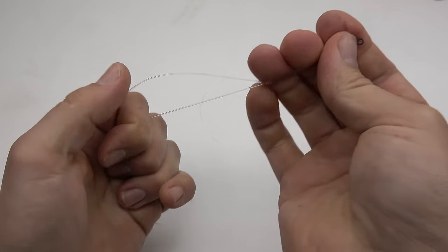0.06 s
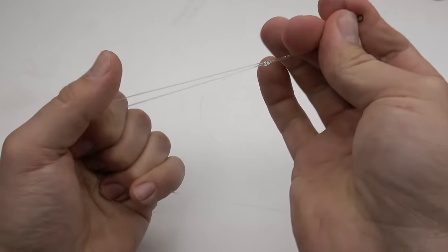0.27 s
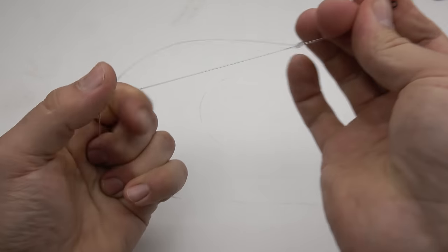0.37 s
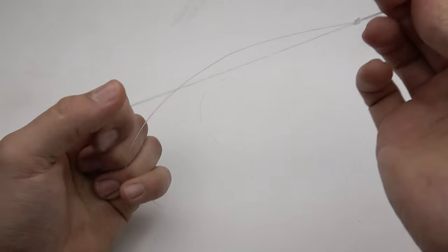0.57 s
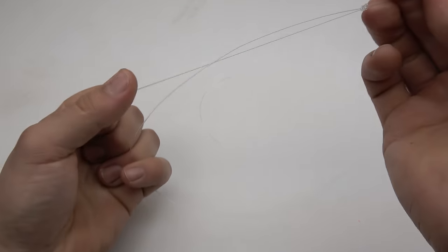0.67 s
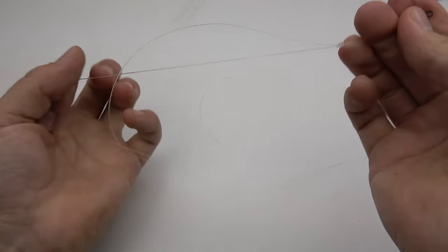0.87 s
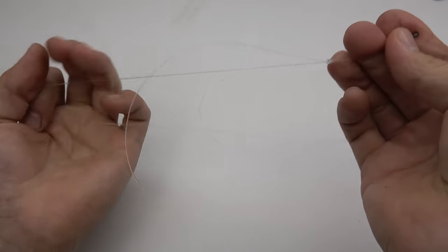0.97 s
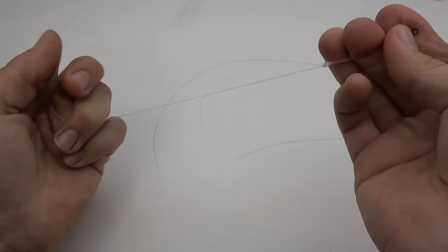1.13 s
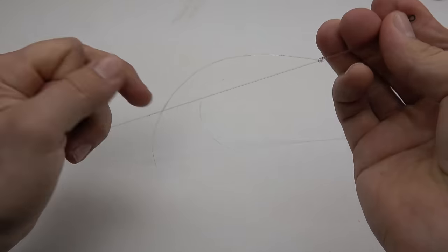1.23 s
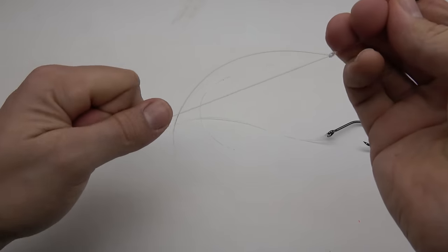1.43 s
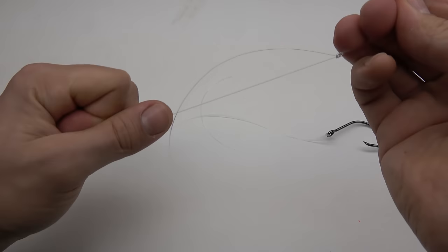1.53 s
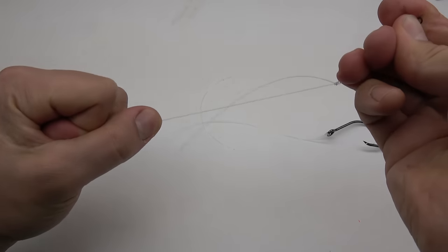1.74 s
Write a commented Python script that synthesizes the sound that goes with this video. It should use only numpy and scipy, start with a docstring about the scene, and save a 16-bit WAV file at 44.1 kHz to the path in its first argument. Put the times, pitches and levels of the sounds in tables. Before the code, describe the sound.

Hands tighten a fishing line knot with creaks, thumps and clicks, then faint sliding.

```python
"""A low rustle and creak, then dull thumps: two hands jerk a knot of fishing line taut on a metal swivel.
The knot slips with hollow knocks and snaps; the swivel's ring clinks against its barrel and the line
squeaks thinly as it binds on the eye. Then the line slides through the fingers with a fine stick-slip
rasp and small ticks. All close to the microphones, in a small room."""
import sys
import numpy as np
from scipy import signal
from scipy.fft import rfft, irfft
from scipy.io import wavfile
from scipy.ndimage import uniform_filter1d

SR = 44100
rng = np.random.default_rng(int(sys.argv[2]) if len(sys.argv) > 2 else 0)


def waveform_to_disk(signal):
    """Save audio, clipped to [-1, 1], as 16-bit WAV at the path in sys.argv[1]."""
    frames = np.transpose(np.atleast_2d(signal))
    scaled = np.clip(frames, -1, 1) * 32767
    samples = np.round(scaled).astype(np.int16)
    wavfile.write(sys.argv[1], SR, samples)


N = 79380
T = np.arange(N) / SR

# room air spectrum: freq_hz, density_db
AIR_SPECTRUM = [(12, -41), (20, 6), (113, 3.5), (204, -7), (241, -12.5), (485, -3.5), (527, -16.5),
                (678, -6.5), (1370, -10), (1960, -11), (16000, -21.5)]
# hand rustle envelope: time_s, level_db
RUSTLE_LEVEL = [(0, -57.5), (.15, -59.5), (.5, -48), (.95, -71.5), (1.12, -64), (1.24, -66), (1.29, -56.5),
                (1.5, -69.5), (1.62, -71.5), (1.8, -76)]
# hand rustle spectrum: freq_hz, density_db
RUSTLE_SPECTRUM = [(30, -12.5), (60, 3.5), (140, -1.5), (300, -2.5), (600, -10.5), (1500, -19.5),
                   (5000, -30.5), (16000, -40)]
# left-right likeness of air and rustle: freq_hz, coherence
BACKGROUND_COHERENCE = [(60, 1), (300, 0.76), (700, 0.64), (3000, 0.97), (15000, 0.2)]
# left-right likeness of the room tail: freq_hz, coherence
ROOM_COHERENCE = [(100, 0.78), (500, 1), (2500, 0.96), (6000, 0.68), (15000, .6)]
# left-right likeness of the line's noises: freq_hz, coherence
LINE_COHERENCE = [(100, 0.84), (2500, 1), (5000, 0.99), (8500, 0.77), (15000, 0.88)]
# room decay: freq_hz, t60_s
ROOM_DECAY = [(100, 0.37), (500, 0.21), (2000, 0.26), (6000, 0.13), (15000, 0.083)]
# low room resonances: freq_hz, gain_db, t60_s
ROOM_MODES = [(79, 0, .48), (108, 4, .38), (128, 2, .38), (217, 2, .36), (267, -1, .38), (435, 5, .42)]
# feed to the room tail: source, gain_db
ROOM_SEND_DB = {"thump": -18, "knock": -10.5, "snap": -10.5, "metal": -11, "rub": -15.5}
# reflections off palms and table: left_delay_s, right_delay_s, level_db
ECHOES = [(.00062, 0.00033, -22), (.0019, 0.0015, -29.5), (.0034, 0.0065, -19)]
# microphone mismatch: freq_hz, left_minus_right_db
MIC_BALANCE = [(60, 2), (115, -1), (210, 4.5), (500, 0.5), (1200, 1.5), (4000, -2), (15000, -0.5)]
# source positions: source, left_minus_right_db
PAN_DB = {"thump": -4, "knock": -1, "metal": -6.5}
# position of rubbing and snaps: time_s, left_minus_right_db
LINE_PAN = [(.24, -1.5), (.45, -2.5), (.58, -3), (.66, -1.5), (.9, 0), (1.5, 0.7)]

# creak of loaded line: time_s, level_db
CREAK_LEVEL = [(0, -80), (.18, -59), (.203, -43.5), (.235, -39.5), (.255, -33), (.28, -42), (.34, -45.5),
               (.41, -56.5), (.45, -58.5), (.525, -52.5), (.546, -31.5), (.6, -34.5), (.655, -38.5),
               (.7, -50.5), (.78, -69.5), (1.8, -81.5)]
# creak spectrum: freq_hz, density_db
CREAK_SPECTRUM = [(60, -11), (200, 10), (500, 7.5), (1000, -2.5), (2200, -7), (4000, -3.5), (8000, -6),
                  (12500, -12), (16000, -20)]
# line sliding through the fingers: time_s, level_db, brightness (0-1)
SLIDE = [(.6, -42, 0.9), (.68, -42, 0.96), (.74, -42.5, 0.81), (.76, -59, .9), (.77, -42, 0.97),
         (.825, -53, 0.81), (.875, -43, 0.99), (.91, -51.5, 0.92), (.925, -56.5, 0.5), (.985, -65, 1),
         (.998, -45.5, 1), (1.025, -49.5, 1), (1.1, -46, 0.82), (1.175, -48, 0.5), (1.2, -59.5, 0.8),
         (1.22, -49.5, 0.02), (1.26, -59, 0.47), (1.32, -55, 0.47), (1.385, -50, .4), (1.415, -49.5, 0.5),
         (1.455, -40.5, 0.23), (1.478, -49.5, 0.27), (1.5, -44.5, 0.38), (1.525, -59, 0.2),
         (1.58, -66.5, 0.53), (1.8, -83, 0.05)]
# brisk slide spectrum: freq_hz, density_db
BRISK_SPECTRUM = [(100, -55), (1000, -17), (2000, -21.5), (3000, -17), (4500, -3), (8000, 1.5),
                  (11000, -7.5), (13500, -8.5), (16000, -21)]
# slow slide spectrum: freq_hz, density_db
SLOW_SPECTRUM = [(100, -1), (500, -27), (1000, -9.5), (1500, -7), (2050, -5.5), (2600, 6.5), (4200, 7.5),
                 (5500, 1), (8000, -16), (11000, -11.5), (13000, -13), (16000, -27)]
# ring striking the barrel: start_s, relative_db, pitch_ratio
CLINKS = [(.434, -22, 1), (.4772, -3, .995), (.5415, -7, 1.025), (.5818, 0, 1.025), (.588, -4, 1.02)]
# swivel modes: freq_hz, level_db, t60_s
SWIVEL_MODES = [(4885, -31, .16), (7350, -23, .025), (8700, -25, .04), (11720, -6, .016), (12070, 0, .02),
                (12400, -10, .022), (13170, -15, .03)]
# snaps and ticks of slipping line: start_s, level_db, decay_s, treble_db_per_octave
SNAPS = [(0.199, -35.5, 0.002, -13.5), (.207, -35, 0.0019, -6), (0.242, -28.5, 0.0055, -22.5),
         (0.273, -41, 0.0015, 0), (0.43, -41.5, 0.014, -7), (0.4429, -33, 0.007, -6),
         (0.446, -34.5, 0.0035, 1), (.4777, -36, 0.0082, -4), (0.542, -20.5, 0.0023, -3),
         (0.5697, -18.5, 0.0022, -6.5), (0.5735, -20, 0.003, 2), (0.5891, -28, 0.011, -9),
         (0.6224, -24.5, 0.0032, -3.5), (.641, -28, 0.0027, -7.5), (0.725, -33, 0.002, -4),
         (.766, -42, 0.0037, -6), (0.798, -40, 0.0091, -2), (0.8387, -45.5, 0.0098, -5),
         (0.872, -38, 0.0032, 0), (.887, -37, 0.0023, -1.5), (0.9402, -41, 0.0043, 3),
         (1.09, -39.5, 0.0082, -8.5), (1.229, -46.5, .004, -14.5), (1.381, -45, 0.0057, -9),
         (1.443, -42.5, 0.0037, -11.5), (1.461, -61, 0.0084, -23), (1.4907, -44, 0.0052, -20),
         (1.5936, -58, 0.0059, -2)]
# snap spectrum: freq_hz, density_db
SNAP_SPECTRUM = [(100, -21.5), (800, -42), (2000, -16), (4000, -3.5), (5800, 2), (8500, 6.5), (11000, 2),
                 (13000, 2), (16000, -13.5)]
# hook and swivel resonances: freq_hz, gain_db, t60_s
TACKLE_MODES = [(2606, 2, .15), (3774, -4, .11), (5274, 3, .1), (5775, 1, .1), (5952, 2, .09),
                (7402, -5, .12), (12240, 3, .1), (12539, 5, .09)]
# line giving way in the grip: start_s, level_db, rise_s, decay_s, low_edge_hz, high_edge_hz
KNOCKS = [(.2405, -20.5, .003, 0.0041, 195, 850), (0.282, -29.5, .002, 0.01, 252, 570),
          (0.5351, -16, 0.0016, 0.0029, 388, 2220), (0.6228, -19.5, 0.00033, 0.0053, 460, 3300)]
# knock spectrum: freq_hz, density_db
KNOCK_SPECTRUM = [(130, 1), (250, -7.5), (480, -0.5), (800, -3), (1050, -4.5), (1220, -8.5), (1480, -7),
                  (1950, -7.5), (2550, -4.5), (3500, -5.5), (6000, -24), (16000, -35)]
# ring after a knock: freq_hz, gain_db, t60_s
KNOCK_MODES = [(941, -3, .2), (1406, 5, .3), (1454, 7, .24), (1615, 5, .18)]
# jerks of hands and taut line: start_s, level_db, rise_s
THUMPS = [(0.199, -26, 0.0099), (0.231, -16, 0.012), (0.2487, -11, 0.0037), (0.282, -25, 0.008),
          (0.535, -20.5, 0.0035), (.553, -19.5, .004)]
# modes of a jerk: freq_hz, level_db, t60_s
THUMP_MODES = [(80, -10.5, 0.38), (127, -4.5, .11), (148.3, -6.5, 0.25), (214.3, -0.5, 0.07),
               (231.8, -11.5, 0.17), (474, -3.5, 0.028)]


def amp(db):
    """Decibels to gain."""
    return 10 ** (np.asarray(db) / 20)


def unit_rms(x):
    """Scale to rms 1."""
    return x / np.sqrt(np.mean(x ** 2) + 1e-20)


def at_hz(points, hz):
    """Interpolate a table on a log-frequency axis."""
    points_hz, values = np.transpose(points)
    return np.interp(np.log(hz + 1), np.log(points_hz + 1), values)


def curve(rows, column=1):
    """Interpolate a time table at every sample."""
    rows = np.array(rows)
    return np.interp(T, rows[:, 0], rows[:, column])


def add(mix, start_s, sound):
    """Mix a sound in at start_s."""
    part = mix[..., round(start_s * SR):][..., :sound.shape[-1]]
    part += sound[..., :part.shape[-1]]


def pan(x, left_minus_right_db):
    """Place between left and right; takes a number or a curve."""
    gains = amp(np.array([[.5], [-.5]]) * left_minus_right_db)
    return x * gains / gains.mean(0)


def correlate(channels, coherence):
    """Make two independent channels partly alike, band by band."""
    mid, side = channels
    likeness = np.clip(at_hz(coherence, np.fft.rfftfreq(len(mid), 1 / SR)), 0, .99)
    side = irfft(np.sqrt((1 - likeness) / (1 + likeness)) * rfft(side), len(mid))
    return np.array([mid + side, mid - side])


def noise(coherence, size=N):
    """Stereo Gaussian noise."""
    return correlate(rng.standard_normal((2, size)), coherence)


def colour(x, spectrum, treble_db_per_octave=0, edge_hz=SR):
    """Apply a spectrum, a tilt above 2500 Hz and a low-pass; rms 1."""
    hz = np.fft.rfftfreq(x.shape[-1], 1 / SR)
    tilt_db = treble_db_per_octave * np.log2(np.maximum(hz, 2500))
    gain = amp(at_hz(spectrum, hz) + tilt_db) / np.hypot(1, (hz / edge_hz) ** 4)
    return unit_rms(irfft(rfft(x) * gain, x.shape[-1]))


def ring(modes, rise_s):
    """Decaying modes with a soft onset."""
    t = T[:SR // 2]
    tone = sum(amp(db - 60 * t / t60_s) * np.sin(2 * np.pi * hz * t) for hz, db, t60_s in modes)
    return np.minimum(t / rise_s, 1) * tone


def resonate(x, modes):
    """Add sympathetic ringing; each mode peaks at its gain_db."""
    response = sum(amp(db - 60 * T / t60_s) * np.cos(2 * np.pi * hz * T) * 2 * np.log(1000) / (t60_s * SR)
                   for hz, db, t60_s in modes)
    return x + signal.fftconvolve(x, response[None], axes=1)[:, :N]


def background(air_db=-62):
    """Quiet room air and the low rustle of moving hands."""
    air = amp(air_db) * colour(noise(BACKGROUND_COHERENCE), AIR_SPECTRUM)
    rustle = amp(curve(RUSTLE_LEVEL)) * colour(noise(BACKGROUND_COHERENCE), RUSTLE_SPECTRUM)
    return air + rustle


def room_tail(x, gap_s=0.005):
    """Diffuse reverberation, each band dying at its own rate."""
    hz, t, bands = signal.stft(noise(ROOM_COHERENCE, SR), SR, nperseg=256)
    decay = amp(-60 * t / at_hz(ROOM_DECAY, hz)[:, None])
    tail = signal.istft(bands * decay, SR, nperseg=256)[1][:, :SR] * (T[:SR] > gap_s)
    return signal.fftconvolve(x, tail / np.linalg.norm(tail.mean(0)), axes=1)[:, :N]


def reflect(x):
    """Palms and table add quick echoes, different on each side."""
    hz = np.fft.rfftfreq(2 * N, 1 / SR)
    comb = 1 + sum(amp(db) * np.exp(-2j * np.pi * hz * np.array([[left_s], [right_s]]))
                   for left_s, right_s, db in ECHOES)
    return irfft(rfft(x, 2 * N) * comb / np.sqrt(np.mean(abs(comb) ** 2)))[:, :N]


def friction(spectrum, grains_per_s=3000, spread_db=2.5, grain_share=0.51):
    """Dense stick-slip grains of uneven size over smooth hiss."""
    sizes = amp(spread_db * np.minimum(rng.exponential(1, (2, N)), 4))
    grains = sizes * rng.choice([-1, 1], (2, N)) * (rng.random((2, N)) < grains_per_s / SR)
    hiss = rng.standard_normal((2, N))
    blend = np.sqrt(grain_share) * unit_rms(grains) + np.sqrt(1 - grain_share) * hiss
    return colour(correlate(blend, LINE_COHERENCE), spectrum)


def rubbing():
    """Loaded line creaks, then slides through the fingers, duller as it slows."""
    creak = amp(curve(CREAK_LEVEL)) * friction(CREAK_SPECTRUM)
    brightness = curve(SLIDE, column=2)
    brisk = np.sqrt(brightness) * friction(BRISK_SPECTRUM)
    slow = np.sqrt(1 - brightness) * friction(SLOW_SPECTRUM)
    slide = amp(curve(SLIDE)) * (T > SLIDE[0][0]) * (brisk + slow)
    return pan(creak + slide, curve(LINE_PAN))


def squeak(start_s=.546, length_s=.026, pitch_hz=13845, level_db=-26, waver_ratio=.0015):
    """Line binds on the swivel's eye: a thin, wavering tone."""
    waver = unit_rms(uniform_filter1d(rng.standard_normal(N), size=100))
    hz = pitch_hz * (1 + waver_ratio * waver)
    progress = np.clip((T - start_s) / length_s, 0, 1)
    envelope = np.sqrt(abs(np.sin(np.pi * progress)))
    tone = np.sin(2 * np.pi * np.cumsum(hz) / SR)
    return pan(amp(level_db) * envelope * tone, PAN_DB["metal"])


def clinks(gain_db=-11, rise_s=0.00082):
    """The swivel's ring strikes its barrel and excites high metal modes."""
    out = np.zeros(N)
    for start_s, relative_db, pitch_ratio in CLINKS:
        modes = [(hz * pitch_ratio, db, t60_s) for hz, db, t60_s in SWIVEL_MODES]
        add(out, start_s, amp(gain_db + relative_db) * ring(modes, rise_s))
    return pan(out, PAN_DB["metal"])


def slip_burst(spectrum, rise_s, decay_s, treble_db_per_octave=0, edge_hz=SR):
    """A dying flurry of micro-slips, as shaped noise."""
    t = T[:4096]
    envelope = (1 - np.exp(-t / rise_s)) * np.exp(-t / decay_s)
    burst = envelope * colour(noise(LINE_COHERENCE, len(t)), spectrum, treble_db_per_octave, edge_hz)
    return unit_rms(burst) * np.sqrt(np.mean(envelope ** 2)) / envelope.max()


def snaps(rise_s=0.0003):
    """Turns of line jump over each other and the fingernails; hook and swivel ring along."""
    out = np.zeros((2, N))
    for start_s, db, decay_s, treble_db_per_octave in SNAPS:
        add(out, start_s, amp(db) * slip_burst(SNAP_SPECTRUM, rise_s, decay_s, treble_db_per_octave))
    return resonate(pan(out, curve(LINE_PAN)), TACKLE_MODES)


def knocks():
    """Line gives way in the grip with a hollow knock and a brief ring."""
    out = np.zeros((2, N))
    for start_s, db, rise_s, decay_s, low_edge_hz, high_edge_hz in KNOCKS:
        low_cut = signal.butter(2, low_edge_hz, "high", fs=SR, output="sos")
        burst = slip_burst(KNOCK_SPECTRUM, rise_s, decay_s, edge_hz=high_edge_hz)
        add(out, start_s, amp(db) * signal.sosfilt(low_cut, burst))
    return resonate(pan(out, PAN_DB["knock"]), KNOCK_MODES)


def thumps():
    """Each jerk gives a low thud that sets the room's resonances humming."""
    out = np.zeros(N)
    for start_s, db, rise_s in THUMPS:
        add(out, start_s, amp(db) * ring(THUMP_MODES, rise_s))
    return resonate(pan(out, PAN_DB["thump"]), ROOM_MODES)


def scene():
    """Handling sounds and their room tail, cut below 74 Hz, over the background."""
    parts = {"thump": thumps(), "knock": knocks(), "snap": reflect(snaps()),
             "metal": clinks() + squeak(), "rub": reflect(rubbing())}
    send = sum(amp(ROOM_SEND_DB[name]) * part for name, part in parts.items())
    bass_cut = signal.butter(4, 74, "high", fs=SR, output="sos")
    return signal.sosfilt(bass_cut, sum(parts.values()) + room_tail(send)) + background()


def record(dry):
    """Two microphones of unequal colour, band-limited to 16200 Hz."""
    balance_db = at_hz(MIC_BALANCE, np.fft.rfftfreq(2 * N, 1 / SR))
    heard = irfft(pan(rfft(dry, 2 * N), balance_db))[:, :N]
    low_pass = signal.firwin(255, 16200, window=("kaiser", 9), fs=SR)
    return signal.oaconvolve(heard, low_pass[None], "same")


dry = scene()
out = record(dry)
waveform_to_disk(out)
```